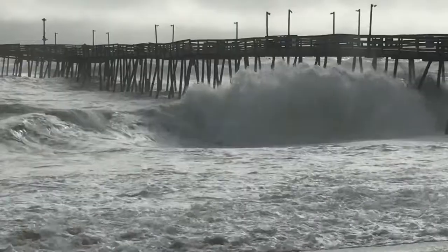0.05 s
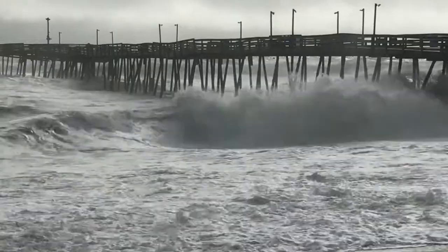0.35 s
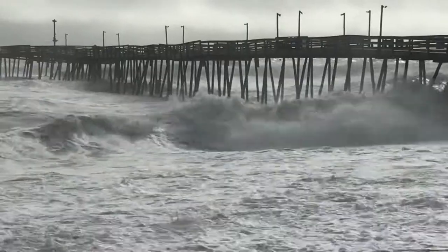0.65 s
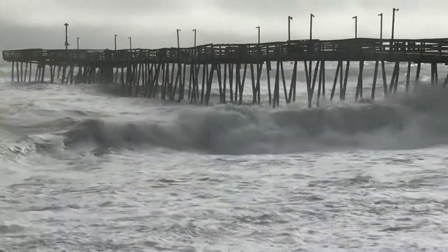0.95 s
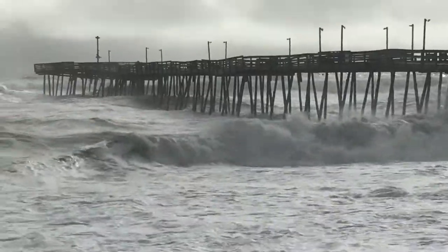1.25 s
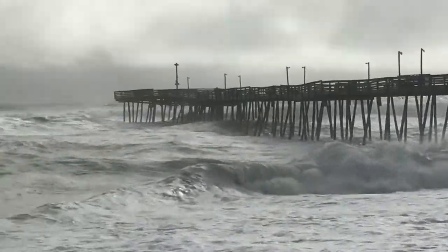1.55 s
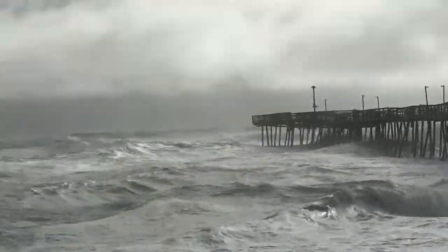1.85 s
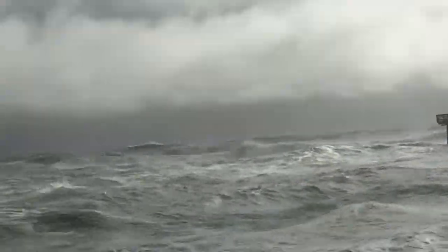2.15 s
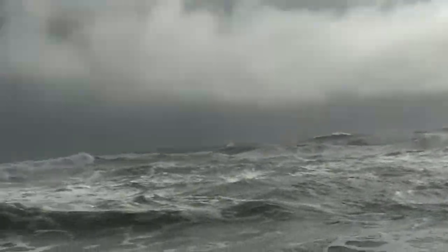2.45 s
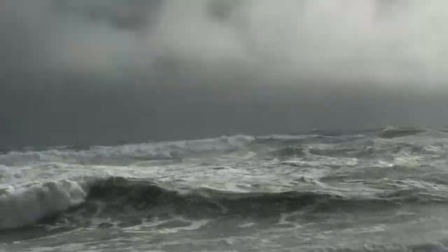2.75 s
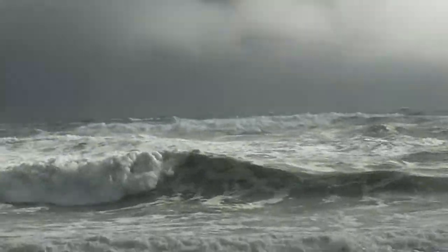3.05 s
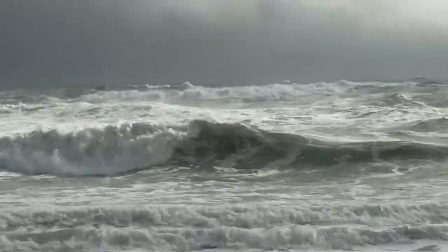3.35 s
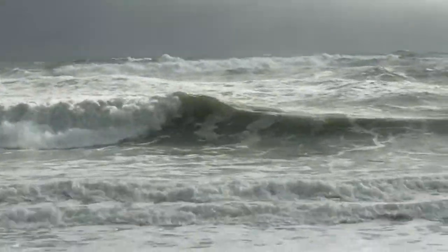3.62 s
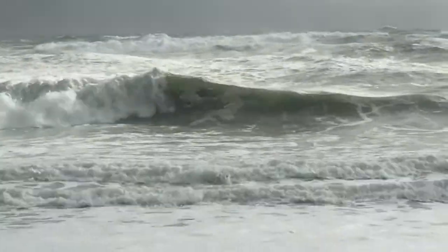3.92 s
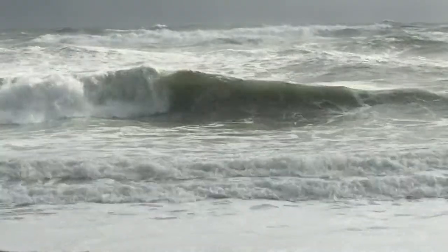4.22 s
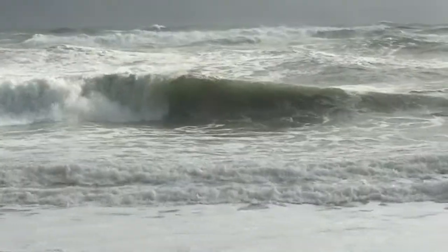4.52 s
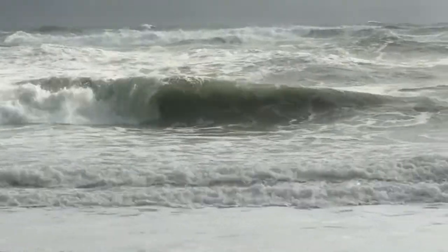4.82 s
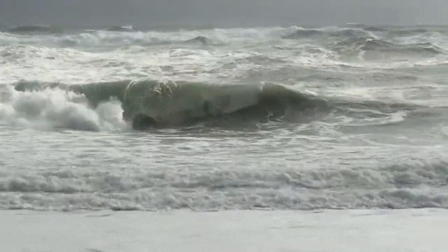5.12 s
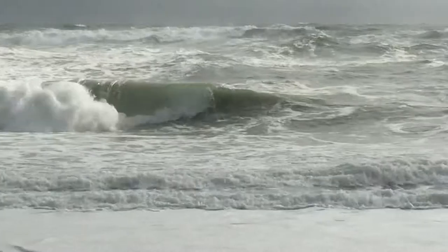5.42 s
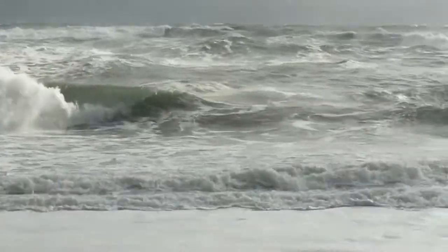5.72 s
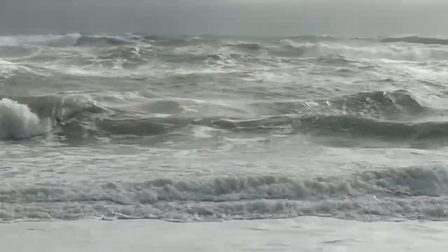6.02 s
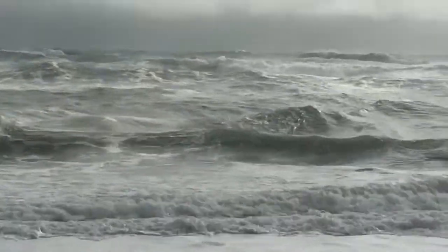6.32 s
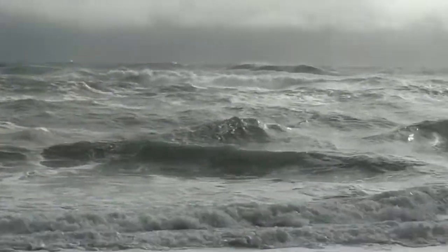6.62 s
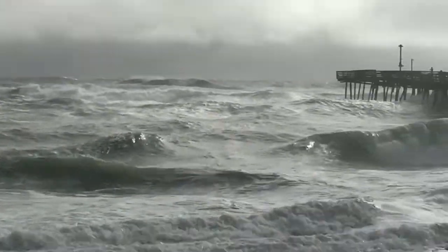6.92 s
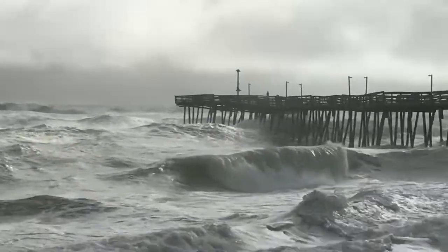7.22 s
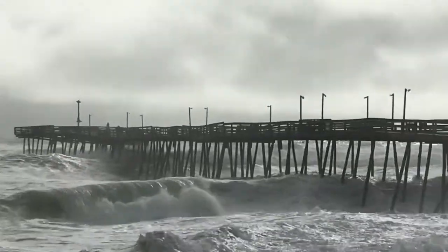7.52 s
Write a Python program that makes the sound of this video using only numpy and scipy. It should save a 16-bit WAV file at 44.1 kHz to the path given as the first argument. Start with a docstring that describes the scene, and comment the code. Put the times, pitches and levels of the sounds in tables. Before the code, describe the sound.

Gusts buffet the microphone with low rumbles and thuds over the continuous roar and foamy hiss of breaking ocean waves.

```python
"""Storm surf in gusting wind

Breakers roar as clouds of bubbles ring; foam hisses on, brightening briefly as two waves break.
The wind rumbles and flutters on a small camera microphone, sets the camera body droning and hoots
once across an edge; its hardest eddies thump the diaphragm."""
import sys
import numpy as np
from scipy import signal
from scipy.fft import rfft, irfft
from scipy.io import wavfile
from scipy.ndimage import uniform_filter1d

SR = 44100
rng = np.random.default_rng(int(sys.argv[2]) if len(sys.argv) > 2 else 0)


def transcribe(signal):
    """Save signal, clipped to [-1, 1], as a 16-bit WAV file at the path in sys.argv[1]."""
    frames = np.atleast_2d(signal).T
    limited = np.clip(frames, -1, 1)
    pcm = np.round(limited * 32767).astype(np.int16)
    wavfile.write(sys.argv[1], SR, pcm)


N = 338247
TIME_S = np.arange(N) / SR


# Plunging waves: (peak time [s], level [dB], rise [s], fall [s])
PLUNGE_EVENTS = [(0.02, -37.5, .1, 0.14), (1.0, -37.5, 0.52, 0.22), (2.1, -41, 0.37, 0.18),
                 (5.51, -35, 0.048, .06), (6.2, -41, 0.96, 0.84), (7.6, -41, .2, .2)]
# Surf roar: (frequency [Hz], relative density [dB])
ROAR_SPECTRUM = [(60, -7), (200, -2), (420, -4.5), (600, 1), (780, 1.5), (980, 2), (1300, 0.5),
                 (1700, -2.5), (2500, -8.5), (4000, -16.5), (9000, -33.5)]

def breakers(steady_db=-38, body_lift_db=1.4):
    """Bubble clouds ring where waves collapse; each plunge swells above the steady roar."""
    power = gain_of(steady_db) ** 2
    for peak_s, db, rise_s, fall_s in PLUNGE_EVENTS:
        width_s = np.where(TIME_S < peak_s, rise_s, fall_s)
        power += gain_of(db) ** 2 * np.exp(-((TIME_S - peak_s) / width_s) ** 2)
    swell_db = 10 * np.log10(power) - steady_db
    roar = coloured(churn(patch_db=1.22, patch_hz=255.6, patch_s=0.06), ROAR_SPECTRUM)
    body_db = body_lift_db - 1.2 * swell_db  # the deep body, from the whole shore, hardly swells
    return gain_of(steady_db + swell_db) * shelved(roar, 860, "low", body_db)


# Foam hiss: (time [s], relative level [dB], relative treble level [dB])
FOAM_CURVE = [(0, -45, -7), (.45, -44.3, -8.5), (.92, -40.5, -9), (1.35, -45.5, -10), (1.75, -46.2, -8.5),
              (2.2, -45, -8), (2.55, -44.8, -8), (3.65, -44.5, -8), (4.1, -46.5, -7.5), (4.85, -45, -7.5),
              (5.45, -43.5, -5), (5.7, -44, -7), (6.4, -44.5, -4), (6.95, -43, -7), (7.3, -44.5, -9),
              (7.6, -42.5, -9.5)]
# Foam hiss: (frequency [Hz], relative density [dB])
FOAM_SPECTRUM = [(700, -29), (2000, -1.5), (3300, 1.5), (4400, -0.5), (6300, -3.5), (7600, -7), (9300, -8),
                 (11500, -13), (13500, -18), (15700, -28)]

def foam(bursts_per_s=1800, burst_gain=0.49):
    """Countless small bubbles burst; the nearest stand out as a fine grain."""
    level_db, fizz_db = follow(FOAM_CURVE)
    near_bursts = rng.standard_normal(N) * (rng.random(N) < bursts_per_s / SR)
    wash = churn(patch_db=1.32, patch_hz=890, patch_s=0.06)
    hiss = coloured(unit_rms(wash) + burst_gain * unit_rms(near_bursts), FOAM_SPECTRUM)
    sway_db = 0.26 * wavering(rate_hz=11)  # gusts bend the sound's path from the sea
    return gain_of(level_db + sway_db + 1.2) * shelved(hiss, 8200, "high", fizz_db - fizz_db.mean())


# Brightenings of the surf hiss: (peak time [s], level [dB], spread [s])
BRIGHTENING_EVENTS = [(.95, -57, .14), (5.46, -46, 0.13)]
# Added hiss: (frequency [Hz], relative density [dB])
BRIGHTENING_SPECTRUM = [(500, -20), (1200, 6), (2000, -18), (3300, 8), (4500, -7), (8000, -11),
                        (15000, -30)]

def hiss_brightening():
    """The surf hiss brightens briefly near 1.2 and 3.3 kHz as two waves break."""
    return swells(BRIGHTENING_EVENTS) * coloured(rng.standard_normal(N), BRIGHTENING_SPECTRUM)


# Gust force: (time [s], relative level [dB])
GUST_CURVE = [(0, -30.5), (.25, -34.5), (1.15, -32.5), (1.26, -23.5), (1.55, -24.5), (1.96, -27.5),
              (2.07, -32), (2.55, -27), (3.05, -31.5), (3.22, -23.5), (3.58, -33.5), (3.76, -22),
              (4.25, -25.5), (4.55, -28), (4.89, -24), (5.08, -33.5), (5.38, -24.5), (5.85, -28),
              (6.5, -23), (7.15, -27.5), (7.38, -30.5), (7.58, -21.5)]
# Large-eddy rumble: (frequency [Hz], relative density [dB])
RUMBLE_SPECTRUM = [(12, -45), (22, -23), (31, -23), (40, -4), (56, 3.5), (100, 2), (135, -1), (190, -21.5),
                   (300, -28), (600, -68)]
# Small-eddy flutter: (time [s], level [dB], high-shelf lift [dB])
FLUTTER_CURVE = [(0, -33.5, 0.5), (.33, -26.5, -2), (.55, -31, -3.5), (.85, -26.5, -6), (1.35, -30.5, 5),
                 (1.85, -28.5, -4.5), (2.3, -35.5, 0), (2.85, -28.5, -4), (3.55, -32, 4.5), (3.85, -32, 3),
                 (4.15, -30.5, 0), (4.38, -36.5, 4), (4.6, -32, -9), (4.98, -34, 2), (5.2, -31, 2),
                 (5.75, -33, 6.5), (6.0, -32, 9.5), (6.4, -28.5, -0.5), (7.0, -28.5, 1.5), (7.67, -30, 0.5)]
# Small-eddy flutter: (frequency [Hz], relative density [dB])
FLUTTER_SPECTRUM = [(40, -40), (100, -10), (150, 2), (195, 2), (240, -3.5), (300, -8), (340, -15),
                    (390, -20), (600, -48), (1500, -75)]

def wind():
    """On the microphone, large eddies rumble in lumps and small ones flutter in quick puffs."""
    gust_db, = follow(GUST_CURVE)
    flutter_db, lift_db = follow(FLUTTER_CURVE)
    rumble = steadied(coloured(rng.standard_normal(N), RUMBLE_SPECTRUM), span_s=0.16)
    flutter = steadied(coloured(rng.standard_normal(N), FLUTTER_SPECTRUM), span_s=0.18)
    lump_db = 1.74 * wavering(rate_hz=4.8)
    puff_db = 2.4 * wavering(rate_hz=12)
    lumps = unit_rms(rumble * gain_of(lump_db))
    puffs = unit_rms(flutter * gain_of(puff_db + 0.32 * lump_db))
    return gain_of(gust_db - 0.7) * lumps + gain_of(flutter_db) * shelved(puffs, 264, "high", lift_db)


# Hardest eddies: (time [s], peak level [dB], pitch [Hz])
HARD_EDDIES = [(.854, -17, 145), (1.278, -14.5, 88.5), (1.48, -10, 103), (1.963, -15, 95),
               (2.257, -13.5, 111), (2.602, -16, 129), (2.647, -13.5, 104), (2.945, -14.5, 173),
               (3.207, -16, 225), (3.278, -18, 330), (3.357, -14.5, 121), (3.745, -12.5, 90.5),
               (3.943, -14, 125), (4.058, -16, 90), (4.148, -13, 229), (4.187, -10, 467), (4.195, -11, 330),
               (4.203, -18, 199), (4.24, -15, 80), (4.283, -13.5, 92.5), (4.402, -13.5, 77.5),
               (4.454, -15.5, 105), (4.572, -16.5, 340), (4.619, -12.5, 221), (4.685, -13, 181),
               (4.866, -14, 79.6), (5.289, -14.5, 104), (5.38, -11.5, 223), (6.078, -12.5, 115),
               (6.331, -10.5, 114), (6.393, -18, 101), (6.55, -14, 100.5), (7.004, -14, 160),
               (7.326, -15, 110)]

def thumps(order=7):
    """An eddy passes as one or two pressure swings: the smaller it is, the shorter and higher."""
    out = np.zeros(N)
    eddies = HARD_EDDIES + lesser_eddies()
    for (peak_s, db, hz), phase in zip(eddies, rng.random(len(eddies))):
        near = abs(TIME_S - peak_s) < 0.05
        angle = 2 * np.pi * hz * (TIME_S[near] - peak_s)
        swing = (1 - 1j * angle / order) ** -order  # fastest as the core goes by
        out[near] += gain_of(db) * (swing * np.exp(2j * np.pi * phase)).real
    return out


def lesser_eddies(rate_per_s=2, over_gust_db=7.5, spread_db=1, low_hz=83, high_hz=165):
    """Chance eddies scale with the gust that carries them: (time [s], peak level [dB], pitch [Hz])."""
    time_draw, level_draw, pitch_draw = rng.random((round(rate_per_s * N / SR), 3)).T
    peak_s = time_draw * N / SR
    db = follow(GUST_CURVE, peak_s)[0] + over_gust_db + spread_db * (1 - 2 * level_draw)
    hz = low_hz * (high_hz / low_hz) ** pitch_draw
    return list(zip(peak_s, db, hz))


def body_drone(resonance_hz=77, width_hz=4):
    """Buffeting keeps a narrow low resonance of the camera body ringing."""
    gust_db, = follow(GUST_CURVE)
    hz = np.fft.rfftfreq(N, 1 / SR)
    response = 1 / (1 + 2j * (hz - resonance_hz) / width_hz) ** 2
    ring = irfft(rfft(rng.standard_normal(N)) * response, N)
    return gain_of(gust_db - 5) * steadied(unit_rms(ring), span_s=0.15)


# Airflow flurries: (peak time [s], level [dB], spread [s])
FLURRY_EVENTS = [(3.2, -27, 0.021), (4.195, -19.5, .009), (4.58, -27, 0.012), (4.83, -33, 0.025),
                 (5.18, -29.5, 0.023), (5.42, -30.5, .045)]
# Flurry: (frequency [Hz], relative density [dB])
FLURRY_SPECTRUM = [(80, -16), (200, 5), (300, -0.5), (480, -7), (700, -20.5), (1500, -50), (5000, -95)]

def flurries():
    """The airflow briefly breaks into tiny eddies: a ragged flap, higher than the flutter."""
    flap = steadied(coloured(rng.standard_normal(N), FLURRY_SPECTRUM), span_s=0.071)
    return swells(FLURRY_EVENTS) * flap


# Edge tone: (time [s], pitch [Hz], relative level [dB])
HOOT_CURVE = [(5.07, 164.5, -47), (5.09, 165, -22), (5.12, 179.5, -23.5), (5.15, 198, -21.5),
              (5.163, 196, -16), (5.175, 202, -45)]

def hoot(trim_db=-2):
    """Vortices shed from an edge make a brief rising tone."""
    hz, db = follow(HOOT_CURVE)
    sounding = (TIME_S > HOOT_CURVE[0][0]) & (TIME_S < HOOT_CURVE[-1][0])
    cycles = np.cumsum(hz) / SR + rng.random()
    return np.sqrt(2) * gain_of(db + trim_db) * sounding * np.sin(2 * np.pi * cycles)


# Echoes off close surfaces: (start [s], end [s], delay [s], gain [ratio])
NEAR_ECHOES = [(0, 2.3, 0.0018, 0.081), (2.9, 5.7, 0.00088, 0.056), (4.1, 7.2, .00213, 0.057),
               (4.8, 6.1, 0.0017, 0.082)]

def reflected(sea):
    """Faint, very short echoes give the sea a comb colour that shifts as the camera turns."""
    out = sea.copy()
    for start_s, end_s, delay_s, gain in NEAR_ECHOES:
        facing = np.interp(TIME_S, [start_s - .2, start_s + .2, end_s - .2, end_s + .2], [0, 1, 1, 0])
        out += gain * facing * np.roll(sea, round(delay_s * SR))
    return out


def churn(patch_db, patch_hz, patch_s):
    """Noise whose patches of pitch swell and fade as separate masses of water collapse."""
    hz, frame_s, spectra = signal.stft(rng.standard_normal(N), SR, nperseg=1024, noverlap=768)
    patches = rng.standard_normal(spectra.shape[::-1])
    patches = uniform_filter1d(patches, int(patch_s / frame_s[1]) + 1, axis=0)
    patches = uniform_filter1d(patches, int(patch_hz / hz[1]) + 1, axis=1)
    spectra *= gain_of(patch_db * unit_rms(patches).T)
    return signal.istft(spectra, SR, nperseg=1024, noverlap=768)[1][:N]


def gain_of(db):
    """Decibels as an amplitude factor."""
    return 10 ** (np.asarray(db) / 20)


def unit_rms(x):
    """x scaled to rms 1."""
    return x / np.sqrt(np.mean(x ** 2) + 1e-20)


def follow(curve, at_s=TIME_S):
    """A curve table's value columns, interpolated in time."""
    knots_s, *columns = np.transpose(curve)
    return [np.interp(at_s, knots_s, column) for column in columns]


def swells(events):
    """Envelope of one Gaussian swell per event."""
    return sum(gain_of(db) * np.exp(-0.5 * ((TIME_S - peak_s) / spread_s) ** 2)
               for peak_s, db, spread_s in events)


def coloured(x, spectrum):
    """x filtered by a spectrum table on a log-frequency axis, at rms 1."""
    knots_hz, knots_db = np.transpose(spectrum)
    hz = np.fft.rfftfreq(N, 1 / SR)
    db = np.interp(np.log(hz + 1), np.log(knots_hz + 1), knots_db)
    return unit_rms(irfft(rfft(x) * gain_of(db), N))


def steadied(x, span_s):
    """x with swells slower than span_s evened out."""
    window = signal.windows.hann(int(span_s * SR) + 3)
    power = signal.fftconvolve(x ** 2, window / window.sum(), "same")
    return x / np.sqrt(power + 1e-6)


def shelved(x, edge_hz, side, lift_db):
    """x with its "low" or "high" side lifted by a curve."""
    band = signal.sosfiltfilt(signal.butter(2, edge_hz, side, fs=SR, output="sos"), x)
    return x + (gain_of(lift_db) - 1) * band


def wavering(rate_hz):
    """Smooth random curve of rms 1, strongest near rate_hz."""
    ratio = np.fft.rfftfreq(N, 1 / SR) / rate_hz
    return unit_rms(irfft(rfft(rng.standard_normal(N)) * ratio * np.exp(-ratio ** 2 / 2), N))


def scene():
    """The sea ahead and the wind at the microphone, in mono."""
    sea = reflected(breakers() + foam() + hiss_brightening())
    return (sea + wind() + body_drone() + thumps() + flurries() + hoot())[None]


# Microphone grille and cavity peaks and notches: (centre [Hz], width [Hz], gain [dB])
GRILLE_BANDS = [(2060, 305, 3), (3030, 340, -3), (3190, 160, 2.5), (4920, 530, -3.5), (10430, 800, -4)]

def record(dry, cutoff_hz=15720):
    """The grille colours the sound; a steep low-pass limits the band."""
    hz = np.fft.rfftfreq(N, 1 / SR)
    grille_db = sum(db * 2 ** -((2 * (hz - centre_hz) / width_hz) ** 2)
                    for centre_hz, width_hz, db in GRILLE_BANDS)
    heard = irfft(rfft(dry) * gain_of(grille_db), N)
    lowpass = signal.firwin(1023, cutoff_hz, window=("kaiser", 9), fs=SR)
    return signal.oaconvolve(heard, lowpass[None], "same")


dry = scene()
out = record(dry)
transcribe(out)
```